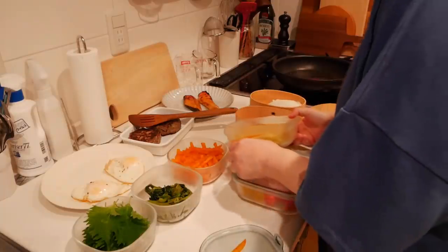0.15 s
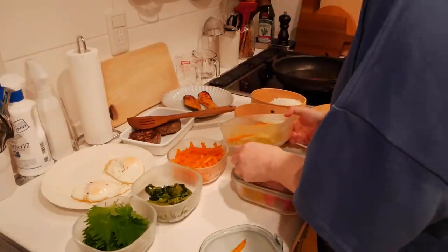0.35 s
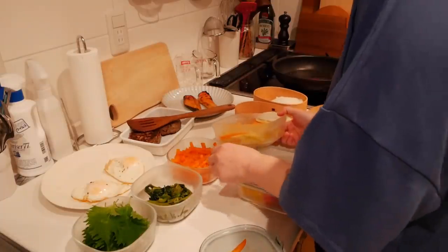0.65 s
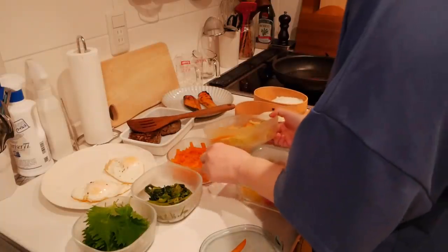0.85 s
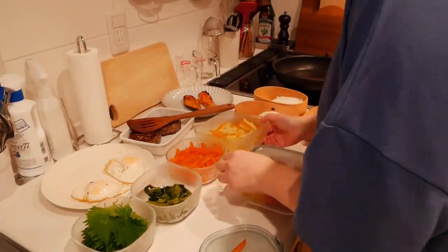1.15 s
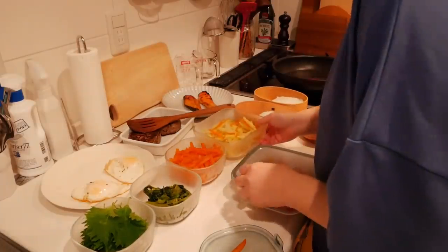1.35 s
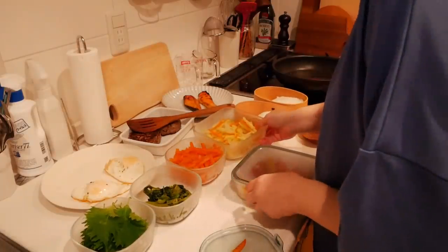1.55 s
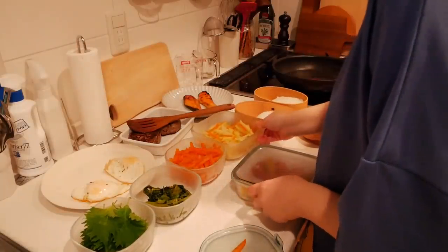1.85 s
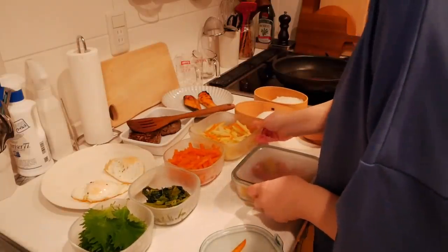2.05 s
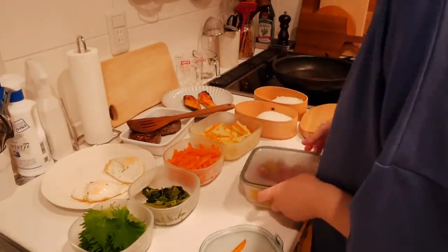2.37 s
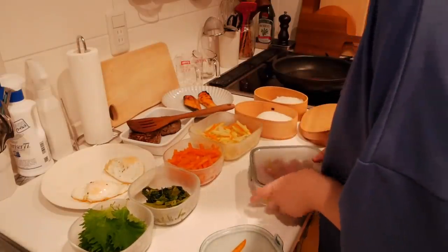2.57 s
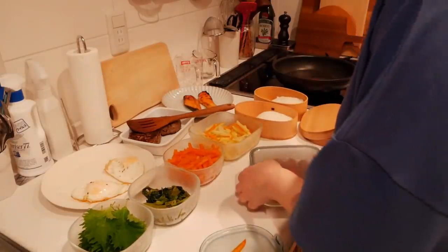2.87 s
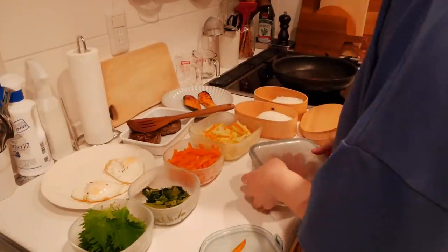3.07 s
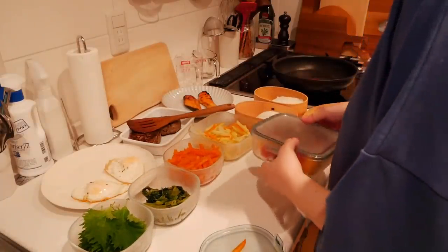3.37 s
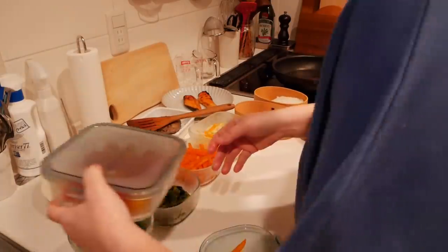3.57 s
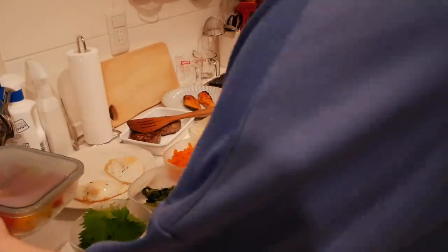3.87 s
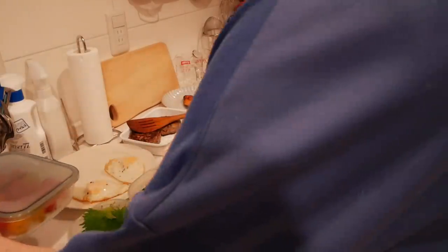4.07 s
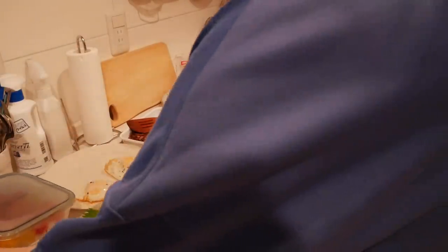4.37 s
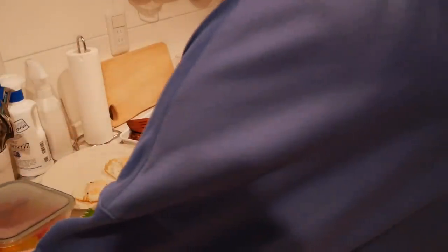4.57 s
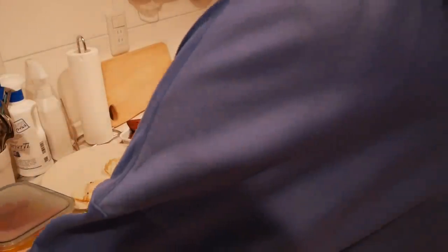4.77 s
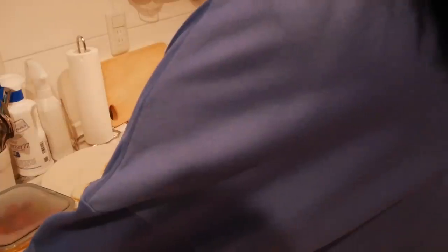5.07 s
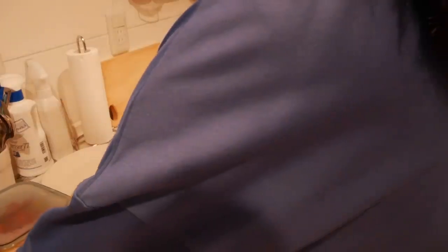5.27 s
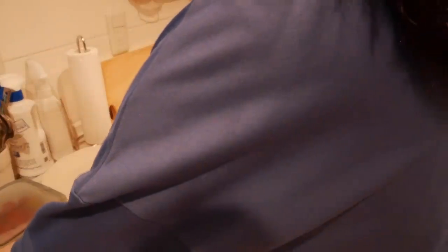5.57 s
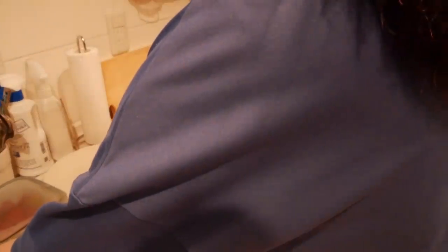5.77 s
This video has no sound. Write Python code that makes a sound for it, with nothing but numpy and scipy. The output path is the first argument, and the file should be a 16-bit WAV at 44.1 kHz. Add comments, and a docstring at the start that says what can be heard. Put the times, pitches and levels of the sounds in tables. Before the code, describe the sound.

A small, quiet home kitchen heard close, almost mono, with soft low room tone and short reflections. From 0 to 0.6 seconds, plastic tubs and a dish clatter in a rapid run of hard, bright knocks and muffled bumps, over rough uneven sliding that lasts until about 1.1. A strong box knock lands at 0.93, followed by a dull bump at 1.0 and a bowl clink at 1.1. A faint sleeve swish passes near 1.27, then a heavy damped bump at 1.48, tiny bowl taps at 1.6 to 1.7 and a firm box knock at 1.92. Light scuffs and very faint base taps follow around 2.3 to 2.5. From 3 to 4.9 it is nearly still, with only slight rubbing and a barely audible cloth brush. At 5.0 a box lands with a solid thump; at 5.2 a muffled bump and plate clink, a short scrape, then a lid clacks at 5.8.

```python
"""Food containers are shuffled on a kitchen counter: a lidded plastic box is set down, bowls clink,
and the box is carried aside, lands on its base and nudges a plate; a lid clacks last.
Each blow is a coloured knock on the counter plus the decaying modes of the thing struck; loose rims add ticks.
Filtered noise makes the uneven sliding, the sleeve's swishes and the room tone of a small quiet kitchen.
A nearly mono pair of microphone ports hears it all."""
import sys
import numpy as np
from scipy import signal
from scipy.fft import rfft, irfft
from scipy.io import wavfile

SR = 44100
rng = np.random.default_rng(int(sys.argv[2]) if len(sys.argv) > 2 else 0)


def int16_out(signal):
    """Quantize to a 16-bit WAV file."""
    q = np.round(np.clip(np.atleast_2d(signal).T, -1, 1) * 32767)
    wavfile.write(sys.argv[1], SR, q.astype(np.int16))


N = 261513

EDGE_HZ = 16100  # top of the recorded band
TAIL = np.arange(SR * 2 // 3) / SR  # time axis of rings and echoes [s]
KNOCK_DB = 8  # level of all knocks and rattles


def amp(db):
    """Decibels to gain."""
    return 10 ** (np.asarray(db) / 20)


def unit(x):
    """Scales to an energy of 1."""
    return x / np.sqrt(np.sum(x ** 2, axis=-1, keepdims=True) + 1e-20)


def read(points, hz):
    """Reads a curve of (frequency, value) points on a log-frequency axis."""
    f, value = np.transpose(points)
    return np.interp(np.log(hz + 1), np.log(f + 1), value)


def add(mix, s, sound):
    """Mixes a sound in at time s, cut off where the mix ends."""
    part = mix[max(round(s * SR), 0):][:len(sound)]
    part += sound[:len(part)]


def noise(spectrum):
    """Steady coloured noise of rms 1."""
    colour = amp(read(spectrum, np.fft.rfftfreq(N, 1 / SR)))
    white = rng.standard_normal(N)
    return np.sqrt(N) * unit(irfft(rfft(white) * colour, N))


def scatter(size):
    """A burst of dense reflections: flat spectrum, random phases."""
    return irfft(np.exp(2j * np.pi * rng.random(size // 2 + 1)), size)


def room_tone():
    """Still air of the kitchen: steady noise, strongest in the bass."""
    # spectrum of the still air: (frequency [Hz], relative level per Hz [dB])
    still_air = [(12, -53), (20, -7.5), (60, -14.5), (93, -2), (127, -10), (172, 0), (222, -12.5),
                 (262, -2), (377, -8.5), (459, -7.5), (542, -6.5), (2080, -15.5), (3840, -28), (14700, -42),
                 (16000, -37)]
    return amp(-62.5) * noise(still_air)


def push(t, length, attack_s=0.047, release_s=0.1, swell_db=5.5):
    """Envelope of one push, t seconds after it starts: takes hold, presses a little harder, lets go."""
    attack = np.clip(t / attack_s, 0, 1)
    swell = amp(swell_db * (np.clip(t / length, 0, 1) - 1.5))
    release = np.exp(-np.maximum(t - length, 0) / release_s)
    return attack * swell * release


def sliding(grip_db=2.5, slips_per_s=90):
    """Hands push or turn a container on the counter: soft friction noise that grips and slips unevenly."""
    # pushes: (start [s], length [s], level before the swell [dB])
    pushes = [(0.0, 1.14, -56), (1.297, 0.91, -63), (2.316, 0.21, -58), (2.96, 0.035, -60.5),
              (3.063, 0.81, -71.5), (5.244, 0.29, -63.5), (5.732, 0.053, -58.5)]
    # friction spectrum: (frequency [Hz], relative level per Hz [dB])
    rub = [(100, 3), (300, -5.5), (1100, 3), (2500, -10), (5000, -18.5), (9000, -22), (15000, -34.5)]
    t = np.arange(N) / SR
    uneven_db = grip_db * np.interp(t * slips_per_s, np.arange(N), rng.standard_normal(N))
    pressure = sum(amp(db) * push(t - s, length) for s, length, db in pushes)
    return noise(rub) * amp(uneven_db) * pressure


def contacts(settle_damp_db=-7):
    """Yields each touch (s, strength, hardness, damping, thing): a blow, then its drop flat on the counter."""
    # struck or set down, ringing freely: (time [s], strength [dB], hardness as treble [dB], thing)
    blows = [ (0.001, -10, 19.5, "tub"), (0.150, -13.5, 13.5, "tub"), (0.2193, -17.5, -16, "box"),
             (0.3335, -15, -0.5, "dish"), (0.5683, -8, 6, "dish"), (0.9233, -21.5, 15, "bowl"),
             (0.9321, -2, -5, "box"), (1.0949, -11, 8, "bowl"), (1.595, -24, -1, "bowl"),
             (1.702, -27, 9, "bowl"), (1.9168, -8.5, 3.5, "box"), (2.489, -33, -23, "base"),
             (2.522, -37, -16, "base"), (4.9932, -5.5, -6, "base"), (5.203, -11, -1.5, "plate"),
             (5.797, -13.5, 12, "lid"), (5.837, -27.5, 16, "lid"), ]
    # dropping flat off an edge, per thing: (delay [s], change of strength [dB], change of hardness [dB])
    settle = {"tub": (.0052, 6.56, -33.5), "box": (.0153, -12.5, -8.5), "base": (0.0049, -6.5, -8.5),
              "lid": (0.011, -1, 6.6)}
    for s, blow_db, hardness_db, thing in blows:
        yield s, blow_db, hardness_db, 0, thing
        if thing in settle:
            delay_s, louder_db, harder_db = settle[thing]
            # lying flat, its ring is damped by the counter
            yield s + delay_s, blow_db + louder_db, hardness_db + harder_db, settle_damp_db, thing


def contact(weight_db, hardness_db, fizz_db, bass_hz=450, treble_hz=3200, fizz_hz=9500, flex_hz=1100, size=4096):
    """The pulse of one contact: weight lifts its bass, hardness its treble; the flexing counter swings it."""
    # colour of a knock on the counter: (frequency [Hz], relative level per Hz [dB])
    counter_colour = [(30, -25.5), (80, -15), (150, -3), (230, -8), (320, 4.5), (900, 5.5), (1700, 4),
                      (2600, -2), (4800, -10.5), (6800, -17.5), (8700, -21.5), (9700, -28.5),
                      (13500, -34.5), (15800, -42)]
    hz = abs(np.fft.fftfreq(size, 1 / SR))
    db = read(counter_colour, hz)
    db = db + weight_db / (1 + (hz / bass_hz) ** 2)
    db = db + hardness_db * hz ** 2 / (hz ** 2 + treble_hz ** 2)
    db = db + fizz_db * (1 - 1 / (1 + (hz / fizz_hz) ** 10))
    # minimum phase: the pulse starts at once and dies away
    spectrum = np.exp(np.conj(signal.hilbert(np.log(amp(db)))))
    pulse = np.fft.ifft(spectrum).real[:size // 2]
    flex = signal.lfilter(*signal.iirpeak(flex_hz, 1, fs=SR), pulse)
    return pulse - 2 * flex  # bending waves in the counter turn the phase around flex_hz


def overtones(count=44, low_hz=2300, t60=0.0078, uneven_db=4):
    """The many fine high modes of a hard shell, unevenly spaced and loud; mean power gain 1 in their band."""
    place, phase, height = rng.random((count, 3)).T[:, :, None]
    hz = low_hz + (EDGE_HZ - low_hz) * (np.arange(count)[:, None] + place) / count
    t = TAIL[:len(TAIL) // 8]
    decay = amp(uneven_db * (2 * height - 1) - 60 * t / t60)
    waves = decay * np.sin(2 * np.pi * (hz * t + phase))
    return unit(waves.sum(0)) * np.sqrt(2 * (EDGE_HZ - low_hz) / SR)


def through_shell(pulse, tones, share, split_hz=2800):
    """A hard shell turns part of the pulse's treble into a brief shimmer."""
    share = np.clip(share, 0, 1)
    treble = signal.lfilter(*signal.butter(1, split_hz, "highpass", fs=SR), pulse)
    out = np.sqrt(share) * signal.fftconvolve(treble, tones)
    out[:len(pulse)] += pulse - (1 - np.sqrt(1 - share)) * treble
    return out


def kitchen(direct_db, far_db, near_t60=0.092, room_db=-0.5, build_s=0.00085, gap_s=0.00042,
            clump_db=4, clumps_per_s=700):
    """Path from one spot: direct sound, clumps of quick echoes off counter, dishes and tiles, then the room."""
    # decay of the room: (frequency [Hz], time to fall 60 dB [s])
    room_t60 = [(100, 0.48), (400, 0.33), (1200, 0.4), (3000, 0.45), (7000, 0.45), (15000, 0.3)]
    bursts = len(TAIL) // 512 + 1
    near, far = (np.concatenate([scatter(size=512) for _ in range(bursts)])[:len(TAIL)] for _ in range(2))
    clumps = np.interp(TAIL * clumps_per_s, np.arange(len(TAIL)), 2 * rng.random(len(TAIL)) - 1)
    near_gain = amp(2 * clump_db * clumps - 60 * TAIL / near_t60)
    near = unit(near * near_gain * (1 - np.exp(-(TAIL / gap_s) ** 2)))
    # each band of the room fades at its own pace
    hz, t, z = signal.stft(far, SR, nperseg=256)
    fade = amp(-60 * t / read(room_t60, hz)[:, None])
    far = signal.istft(z * fade, SR, nperseg=256)[1][:len(TAIL)]
    far = unit(far * amp(clump_db * clumps) * (1 - np.exp(-TAIL / build_s)))
    path = near + amp(room_db + far_db) * far
    path[0] += amp(direct_db)
    return path


def knock(weight_db, hardness_db, fizz_db, share, path):
    """One knock on the counter, through a shell and along a path; energy 1."""
    pulse = contact(weight_db, hardness_db, fizz_db)
    return unit(signal.fftconvolve(through_shell(pulse, overtones(), share), path))


def woken(modes, hardness_db, full_db=4, muting=0.72, treble_hz=3500):
    """The modes as one blow excites them: a contact softer than full_db wakes the high ones less."""
    muted_db = muting * min(hardness_db - full_db, 0)
    return [(hz, db + muted_db * hz ** 2 / (hz ** 2 + treble_hz ** 2), t60) for hz, db, t60 in modes]


def ring(modes, path, far_db, rise_s=0.0025, echo_db=-3):
    """The free modes of a struck thing swell as the blow spreads through it; each also returns along the path."""
    hz, db, t60 = np.transpose(modes)[:, :, None]
    waves = np.sin(2 * np.pi * hz * TAIL) * amp(-60 * TAIL / t60) * (1 - np.exp(-TAIL / rise_s))
    echoes = signal.fftconvolve(waves, path[None], axes=1)[:, :len(TAIL)]
    heard = unit(unit(waves) + amp(echo_db + far_db) * unit(echoes))
    return (amp(db) * heard).sum(0)


def rattle(fizz_db, share, weight_db=-14, hardness_db=3, direct_db=5, uneven_db=4, count=7):
    """A loose rim chatters: a few light ticks, unevenly spaced and loud, tending to fade; energy 1."""
    chatter_s, fade_db = .065, -18.5  # nominal length of the chatter and its fade meanwhile
    tick = knock(weight_db, hardness_db, fizz_db, share, kitchen(direct_db, 0))
    out = np.zeros(len(TAIL))
    for k, (place, height) in enumerate(rng.random((count, 2))):
        along = (k + .5 + place) / count
        add(out, along * chatter_s, amp(fade_db * along + 2 * uneven_db * height) * tick)
    return unit(out)


def containers(ring_db=5):
    """Every blow knocks the counter and rings the thing struck; loose lids and rims chatter."""
    # treble and room, per thing: (share of treble in fine overtones [0-1], room level [dB])
    shells = {"tub": (.75, 0), "dish": (.9, -5), "bowl": (.9, -2), "box": (.25, -2), "base": (.4, 0),
              "plate": (.85, -1), "lid": (.65, 2)}
    # build: (weight as bass [dB], ring level [dB], direct sound [dB], fizz as top octave [dB])
    build = {"tub": (3.1, 3, 2.2, 2.3), "dish": (-13.5, 5.5, -14.5, -0.5), "bowl": (-3, 3.5, -10, 0),
             "box": (-4, -1.5, 2.5, -1), "base": (-3, 0, 0.5, 3), "plate": (-17, 9.5, -10.5, 8),
             "lid": (5.5, 4, -21.5, 3)}
    # modes each thing rings with: (frequency [Hz], level [dB], time to fall 60 dB [s])
    rings = { "tub": [(331, 3, 0.071), (523, -8.5, 0.1), (847, 1.5, 0.11), (1202, -4.5, 0.11),
             (1512, -4.5, 0.058), (2615, -4, 0.0211), (2907, -9.5, 0.029), (3700, -6, 0.0048),
             (5200, -16.5, 0.14), (8700, -16.5, 0.011)], "dish": [(403, -4, .15), (885, -10, .04),
             (1300, -11, .04), (2150, -3, .012), (2945, -13, .42), (2975, 0.5, .05), (3400, -9, .01),
             (3720, -8, .02), (4867, -8, .035), (5124, -9, .055), (5245, -18, .3), (5340, -12, .025),
             (7325, -19, .06), (7739, -23, .04), (7961, -17, .08)], "bowl": [(420, -8, .08),
             (1678, -6, .06), (2066, -5, .04), (2166, -3, .05), (2632, -11, .08), (3790, -9, .03),
             (4784, -5, .035), (4870, -10, .04), (5445, -13, .025), (5690, -13, .04), (7337, -14, .05),
             (7692, -14, .03), (8973, -16, .05), (10440, -24, .04)], "box": [(385, -7, 0.07),
             (502, -7, 0.04), (643, -11.5, 0.012), (995, -7, 0.03), (1508, -1, 0.02), (1712, 2.5, 0.028),
             (4980, -21, .008), (8470, -21, 0.012)], "base": [(280, -7, .08), (322, 1, .22), (400, -4, .08),
             (699, -6, .06), (1402, -15, .04), (1628, -11, .05), (2613, -17, .03), (3192, -10.5, .014),
             (3930, -13, .014)], "plate": [(290, -11, .14), (446, -8, .1), (865, -5, .1), (1130, -12, .08),
             (2020, -2.5, .022), (2150, -1, .21), (2173, -6, .17), (2560, -12, .04), (2843, -13, .04),
             (3602, -12, .028), (4200, -14, .025), (4801, -17, .04), (5500, -17, .012), (5995, -16, .06),
             (7325, -22, .07), (8781, -20, .025)], "lid": [(400, -3, 0.08), (850, -8, .02), (1513, -3, 0.1),
             (1734, -5, 0.09), (2410, -7, 0.025), (2790, -4, 0.04), (3440, -9, 0.05), (3810, -12, 0.06),
             (5300, -16, .03), (5636, -11, 0.03), (7921, -11, 0.02), (8690, -13, 0.025), (10120, -19, .012),
             (13300, -18, 0.005)], }
    # chatter of loose lids and rims, per thing: level against the blow's knock [dB]
    loose = {"tub": -13.5, "box": -13.5, "base": -18.5, "lid": -17}
    bass_db_per_db = 0.78  # gentler blows stay in contact longer and carry more bass
    ring_db_per_db = 0.33  # harder blows ring more than in proportion
    out = np.zeros(N)
    for s, blow_db, hardness_db, damp_db, thing in contacts():
        share, far_db = shells[thing]
        full_weight_db, modes_db, direct_db, fizz_db = build[thing]
        path = kitchen(direct_db, far_db)

        weight_db = full_weight_db - bass_db_per_db * blow_db
        thud = knock(weight_db, hardness_db, fizz_db, share, path)
        add(out, s, amp(KNOCK_DB + blow_db) * thud)

        level_db = ring_db + modes_db + damp_db + (1 + ring_db_per_db) * blow_db
        add(out, s, amp(level_db) * ring(woken(rings[thing], hardness_db), path, far_db))

        if thing in loose:
            add(out, s, amp(KNOCK_DB + blow_db + damp_db + loose[thing]) * rattle(fizz_db, share))
    return out


def damped_bumps(shimmer=1, direct_db=-1, fizz_db=-4):
    """A container bumps while the hand damps its ring: only the knock on the counter is left."""
    # bumps: (time [s], strength [dB], weight as bass [dB], hardness as treble [dB])
    bumps = [ (0.1883, -13.5, -5, 10.5), (0.209, -26.5, -31, 29), (0.232, -14.5, 5, -30),
             (0.3122, -20.5, -14, -22), (1.002, -8.5, -4.5, -21), (1.3774, -30, -9, -2),
             (1.448, -33, 47, -22), (1.482, -10, 12, 5.5), (4.576, -41, -2, -25), (5.162, -13.5, 5, -27),
             (5.171, -16.5, 8, -8), (5.594, -32, 33, -32), ]
    out = np.zeros(N)
    for s, bump_db, weight_db, hardness_db in bumps:
        thud = knock(weight_db, hardness_db, fizz_db, shimmer, kitchen(direct_db, 0))
        add(out, s, amp(KNOCK_DB + bump_db) * thud)
    return out


def sleeve():
    """A sleeve brushes past: brief swells of thin cloth hiss."""
    # swishes: (time of the peak [s], level [dB], half length [s])
    swishes = [(1.266, -67, 0.088), (3.955, -74.5, .025)]
    # cloth spectrum: (frequency [Hz], relative level per Hz [dB])
    cloth = [(1500, -36), (5000, 4), (15000, -10)]
    t = np.arange(N) / SR
    return noise(cloth) * sum(amp(db) * np.exp(-((t - s) / half) ** 2) for s, db, half in swishes)


def two_ports(mid, hiss_db=-86):
    """Two close microphone ports: a faint scattered side signal and hiss, opposite in sign at each port."""
    # how much the ports differ: (frequency [Hz], side against mid before the hiss [dB])
    width = [(30, -17), (120, -25), (400, -33), (1000, -35), (4000, -25), (12000, -20)]
    side = signal.fftconvolve(mid, scatter(size=256))[:N]
    side = irfft(rfft(side) * amp(read(width, np.fft.rfftfreq(N, 1 / SR))), N)
    side = side + amp(hiss_db) * rng.standard_normal(N)
    return np.array([mid + side, mid - side])


def scene(low_cut_hz=42):
    """The handling, its deep bass cut, over the room tone, heard by two ports."""
    handling = sliding() + containers() + damped_bumps() + sleeve()
    low_cut = signal.butter(2, low_cut_hz, "highpass", fs=SR, output="sos")
    return two_ports(signal.sosfilt(low_cut, handling) + room_tone())


def record(dry):
    """The recorder's band limit: a steep low-pass at EDGE_HZ."""
    low_pass = signal.firwin(511, EDGE_HZ, window=("kaiser", 9), fs=SR)
    return signal.oaconvolve(dry, low_pass[None], "same")


dry = scene()
out = record(dry)
int16_out(out)
```